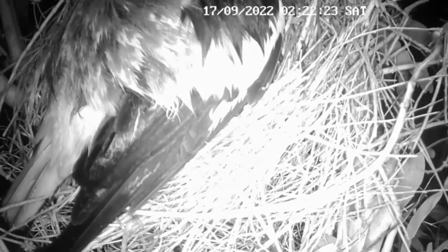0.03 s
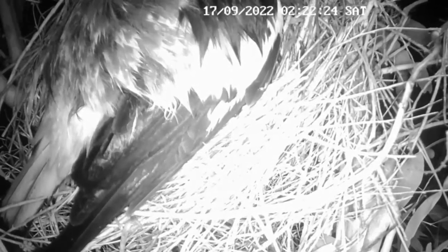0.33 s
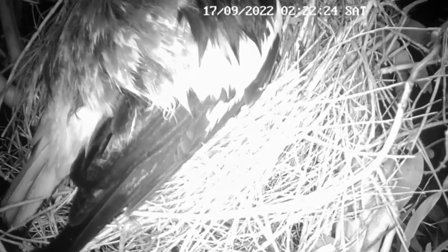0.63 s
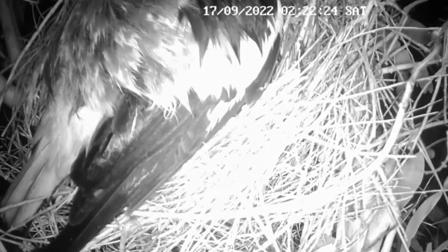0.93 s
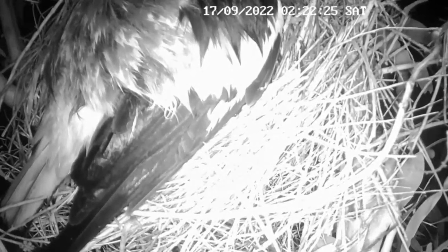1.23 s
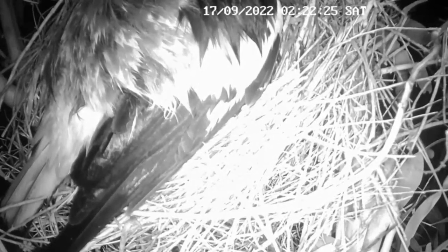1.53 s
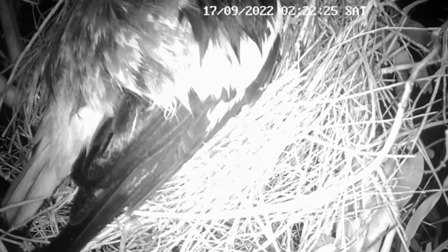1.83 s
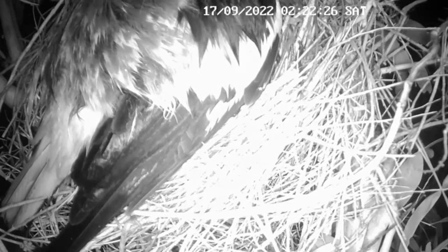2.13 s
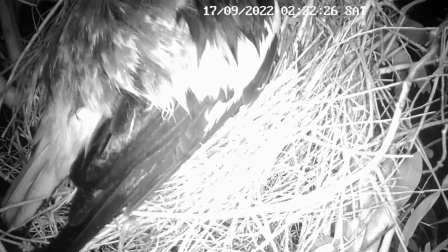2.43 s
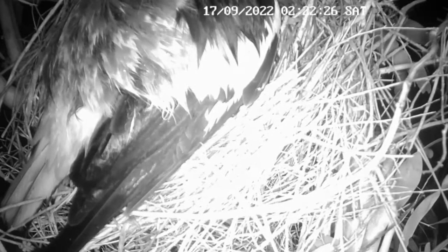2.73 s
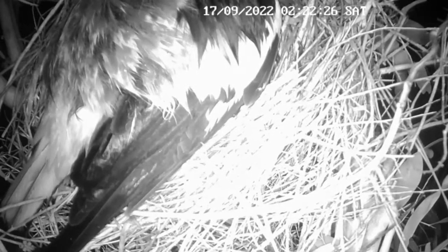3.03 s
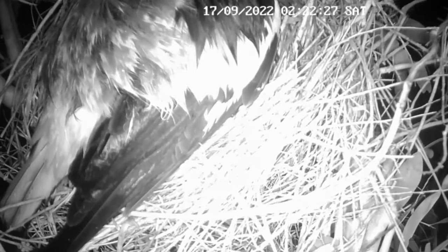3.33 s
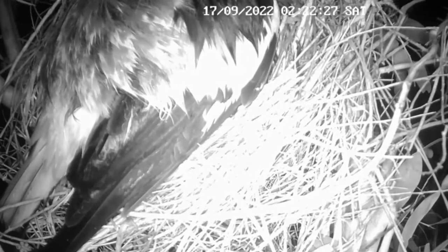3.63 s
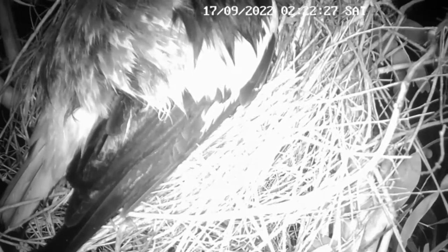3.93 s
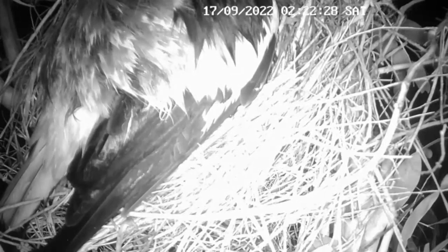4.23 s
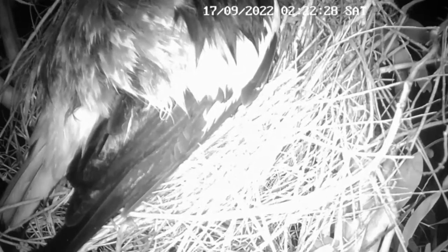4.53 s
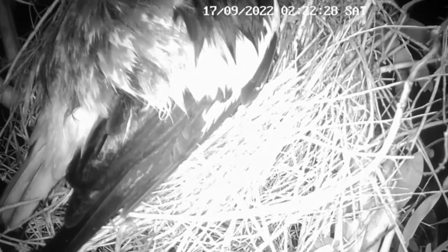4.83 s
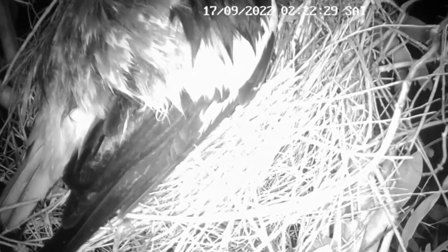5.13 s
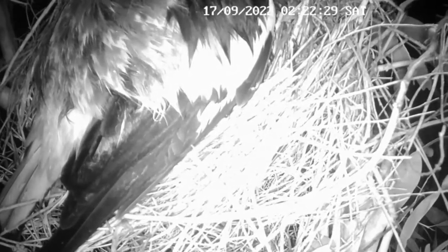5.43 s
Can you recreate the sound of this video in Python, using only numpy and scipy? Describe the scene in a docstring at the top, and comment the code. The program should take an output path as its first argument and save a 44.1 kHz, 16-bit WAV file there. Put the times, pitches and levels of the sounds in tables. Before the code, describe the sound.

Outdoors at night, a brief low puff of wind bumps a small microphone in a bird's nest. Distant frogs call faintly throughout, mixing short, high rising whistles with dry trills over a soft hiss and low rumble. The calls grow busier in the middle. Near the end a stronger gust buffets the microphone, rustling leaves and making dry twigs tick.

```python
"""Distant frogs call at night: short rising whistles and dry trills, pulses that ring a vocal sac.
Trees scatter the calls, and farther callers merge into a chorus over a soft hiss and a faint hum.
Wind buffets a small microphone at a bird's nest, at first and again near the end,
when a gust also stirs leaves and twigs."""
import sys
import numpy as np
from scipy import signal
from scipy.fft import rfft, irfft
from scipy.io import wavfile
from scipy.ndimage import uniform_filter1d

SR = 44100
rng = np.random.default_rng(int(sys.argv[2]) if len(sys.argv) > 2 else 0)


def bounce(signal):
    """Save signal as a 16-bit WAV file at the path given by the first command-line argument."""
    frames = np.transpose(np.atleast_2d(signal))
    limited = np.clip(frames, -1, 1)
    pcm = np.round(limited * 32767).astype(np.int16)
    wavfile.write(sys.argv[1], SR, pcm)


N = 250929
T = np.arange(N) / SR


def whistles(throb_hz=32, throb_db=2.5, buzz_hz=184.2, buzz_depth=0.21, scoop_hz=40, overhang_s=0.018):
    """Amplitude modulation: each rising note throbs, and a fast throat tremor gives it sidebands."""
    # Each row: start in seconds, length in seconds, starting pitch in Hz, rise in Hz, level in dB.
    notes = [(0.036, 0.071, 2210, 59, -63.5), (.275, 0.062, 2226, 58, -63), (.705, 0.091, 2175, 34, -60.5),
             (.865, .06, 2400, 67, -63), (1.33, 0.046, 2185, 60, -61), (1.515, .08, 2110, 93, -59),
             (1.571, 0.073, 2350, 63, -65), (1.6, 0.066, 2150, 87, -55.5), (1.915, 0.094, 2133, 110, -55),
             (2.213, 0.063, 2350, 88, -56.5), (2.235, 0.11, 2180, 20, -55.5),
             (2.339, 0.13, 2054, 194, -58.5), (2.38, 0.14, 2500, 120, -58), (2.52, 0.068, 2200, 53, -56),
             (2.545, 0.12, 2370, 79, -55), (2.589, 0.091, 2135, 140, -53.5), (2.717, 0.1, 2570, 57, -58.5),
             (2.84, .075, 2100, 106, -55.5), (2.915, 0.1, 2120, 100, -55.5), (2.933, .075, 2374, 71, -56),
             (3.044, 0.07, 2610, 27, -58), (3.16, 0.1, 2110, 130, -56.5), (3.235, 0.07, 2107, 75, -56),
             (3.28, .09, 2334, 110, -60), (3.342, 0.069, 2550, 170, -58.5), (3.463, 0.072, 2183, 89, -56.5),
             (3.474, 0.098, 1904, 210, -54), (3.57, .1, 2090, 130, -57.5), (3.635, 0.11, 2350, 80, -55),
             (3.78, 0.066, 2200, 59, -55.5), (3.843, 0.063, 2030, 73, -55), (3.855, 0.061, 2157, 79, -57.5),
             (4.002, 0.079, 2103, 110, -55), (4.005, 0.088, 2360, 156, -58), (4.125, 0.1, 2084, 200, -54.5),
             (4.207, 0.061, 1990, 114, -55), (4.349, 0.067, 2020, 120, -57), (4.355, .1, 2196, 160, -57.5),
             (4.477, 0.098, 2130, 120, -56), (4.722, .085, 2090, 185, -54.5), (4.762, .06, 2375, 40, -52.5),
             (4.97, 0.084, 2023, 93, -61), (5.146, 0.068, 2077, 50, -60), (5.214, 0.039, 2270, 90, -59),
             (5.28, 0.053, 1930, 80, -66), (5.36, 0.066, 2070, 123, -57), (5.462, 0.059, 2073, 83, -57.5),
             (5.525, 0.057, 2182, 50, -53)]
    wobble = 1 + 0.0092 * walk(rate=200)
    # an unsteady throat spreads a narrow skirt of noise round each note
    hoarse = undb(2.0 * walk(rate=160)) + undb(-9) * walk(rate=530)
    faint = [(when, 0.05, 2192.5, 112, -71.5) for when in at_random(count=10)]
    out = np.zeros(N)
    for start, length, start_hz, rise_hz, db in notes + faint:
        progress = np.linspace(0, 1, int((length + overhang_s) * SR))
        now = (int(start * SR) + np.arange(len(progress))) % N
        hz = (start_hz + rise_hz * progress - scoop_hz * (1 - progress) ** 4) * wobble[now]
        tone = np.sin(2 * np.pi * np.cumsum(hz) / SR)
        turn = 2 * np.pi * T[:len(progress)]
        throb = undb(-throb_db * np.cos(throb_hz * turn))
        buzz = 1 + buzz_depth * np.sin(buzz_hz * turn)
        swell = np.sqrt(np.abs(np.sin(np.pi * progress ** 1.25)))
        add(out, start - 0.76 * overhang_s, undb(db) * unit(swell * hoarse[now] * throb * buzz * tone))
    return undb(0.76) * trees(out, t60=.22, wet_db=-6)


def trills(scatter_db=1.7, scatter_pitch=0.025, jitter_s=.0006, fade_db=-3.5):
    """Impulse excitation: uneven, weakening trains of throat pulses ring the vocal sac."""
    # Each row: start in seconds, length in seconds, pulses per second, pitch in Hz, level in dB.
    calls = [(.151, .06, 48, 3460, -54), (.215, .06, 60, 3600, -58), (0.211, .04, 45, 2670, -60.5),
             (.58, 0.023, 81, 3485, -52), (.634, .022, 77, 3490, -49), (.67, .03, 54, 3560, -51),
             (0.717, .13, 62, 3460, -55), (0.755, .04, 70, 2600, -59), (.863, .055, 55, 3630, -60),
             (.865, .05, 50, 2720, -58), (.959, .095, 48, 2710, -56), (1.025, 0.033, 55, 3530, -56),
             (1.057, .1, 45, 3440, -55), (1.158, .08, 58, 2500, -60), (1.251, .06, 50, 3380, -60),
             (1.279, .15, 42, 2620, -61), (1.354, .07, 60, 3500, -53.5), (1.55, .025, 72, 2560, -52),
             (1.591, 0.024, 70, 3560, -53), (1.596, .07, 60, 2590, -60), (1.655, .075, 68, 3520, -52.5),
             (1.912, .055, 58, 3300, -53.5), (1.979, .11, 56, 3560, -59), (2.0, .08, 55, 2700, -60),
             (2.111, 0.015, 58, 3420, -48.5), (2.129, .047, 65, 2570, -57), (2.166, .08, 58, 3520, -54),
             (2.432, .018, 100, 3280, -46.5), (2.497, .074, 89, 3270, -47.5), (2.621, .1, 50, 3520, -57),
             (2.721, .12, 55, 3350, -59.5), (3.045, .125, 65, 3330, -59), (3.38, 0.033, 55, 2740, -58),
             (3.467, .065, 53, 2880, -53.5), (3.465, 0.053, 53, 3650, -59), (3.552, .015, 60, 3540, -49),
             (3.589, .1, 45, 2870, -55), (3.608, .145, 60, 3590, -54.5), (4.037, .17, 45, 2665, -63),
             (4.273, .03, 48, 2830, -54), (4.338, 0.069, 48, 2800, -56), (4.336, 0.069, 48, 3800, -54.5),
             (4.561, .16, 50, 2650, -58), (4.837, .16, 54, 3500, -58.5)]
    faint = [(when, .12, 76, 3200, -67) for when in at_random(count=9)]
    faint += [(when, .119, 84, 2535, -64.5) for when in at_random(count=9)]
    out = np.zeros(N)
    for start, length, rate, hz, db in calls + faint:
        ring_s = .00125 * 3500 / hz  # a higher resonance rings more briefly
        call = np.zeros(N // 8)
        for t, (late, size, sharp) in zip(np.arange(0, length, 1 / rate), rng.standard_normal((32, 3))):
            strength = undb(scatter_db * size + fade_db * t / length)
            pulse = strength * vocal_sac(hz * (1 + scatter_pitch * sharp), ring_s)
            onset = int(max(t + jitter_s * late, 0) * SR)
            call[onset:onset + len(pulse)] += pulse
        add(out, start - ring_s, undb(db) * call * np.sqrt(length * SR / np.sum(call ** 2)))
    return trees(out, t60=.28, wet_db=-4.5)


def vocal_sac(hz, rise_s):
    """Damped resonance: the response to one pulse swells and dies away."""
    t = T[:SR // 40]
    envelope = (t / rise_s * np.exp(1 - t / rise_s)) ** 2
    return envelope * np.sin(2 * np.pi * hz * t + rng.uniform(0, 2 * np.pi))


def trees(dry, t60, wet_db):
    """Scattering: trunks and foliage give a distant call a short reverberant tail."""
    tail = rng.standard_normal(SR) * np.exp(-np.log(1000) * T[:SR] / t60)
    wet = undb(wet_db) * signal.fftconvolve(dry, tail / np.linalg.norm(tail))[:N]
    return (dry + wet) / np.hypot(1, undb(wet_db))


def wind(rumble_db=-3, flutter_db=-12.5, flutter_growth=1.685, edge_ratio=3.6):
    """Turbulence: eddies press on the microphone as slow rumble, quicker flutter and single buffets."""
    # Each row: frequency in Hz, relative spectral density in dB.
    rumble_spectrum = [(8, 0.5), (24, 2), (45, -10), (70, -12), (110, -23), (200, -55), (500, -118.5)]
    flutter_spectrum = [(50, -26), (90, -2), (125, 3), (165, 4), (210, -11), (300, -12.5), (450, -20.5),
                        (700, -39), (1500, -77.5)]
    # Each row: time of reaching full force in seconds, hold in seconds, relative level in dB.
    gusts = [(0, 0.14, -27), (0.226, 0.32, -30.5), (3.38, 0.099, -29), (3.496, 0.12, -29),
             (3.648, 0.71, -38), (4.057, 0.038, -29.5), (4.707, 0.51, -25.5), (5.144, 0.38, -11.5),
             (5.154, 0.02, -8), (5.39, 0.052, -5), (5.577, 0.11, -16)]
    # Each row: time in seconds, peak in dB, pitch in Hz, sharp edge in dB relative to the peak.
    buffets = [(.008, -26, 142, -48), (0.016, -16.5, 126, -39), (0.025, -16, 74, -33),
               (.064, -9, 90.4, -41), (.1, -38, 124, -34), (0.246, -20.5, 61, -39), (0.275, -43, 88.4, -36),
               (0.365, -27.5, 64.4, -37), (0.427, -34.5, 99, -31), (.461, -29, 61.4, -33),
               (3.398, -34, 86.6, -30), (3.554, -36, 69.6, -38), (4.067, -32, 46.6, -35),
               (4.727, -20.5, 66, -35), (4.871, -30, 99, -31), (5.12, -24.5, 114, -30),
               (5.136, -27.5, 104, -24), (5.169, -6.5, 42.7, -7.5), (5.199, -16, 50, -31),
               (5.228, -14, 60, -31), (5.254, -14.5, 104, -26.5), (5.265, -18.5, 45, -34),
               (5.301, -14.5, 78, -22), (5.343, -20, 55, -33), (5.366, -21, 119, -22),
               (5.389, -14.5, 42, -28), (5.408, -9, 137, -28), (5.429, -15, 233, -20.5),
               (5.451, -10, 45, -18), (5.462, -11, 141, -23.5), (5.47, -11, 60, -27),
               (5.504, -10.5, 47.4, -30), (5.534, -24.5, 209, -44), (5.559, -17.5, 93, -31),
               (5.595, -20, 89, -29.5), (5.63, -25, 64.6, -31)]
    force = np.max([undb(db) * gust(start, hold) for start, hold, db in gusts], axis=0)
    rumble = steady(noise(rumble_spectrum)) * undb(rumble_db) * force
    # a harder gust is more turbulent, so flutter grows faster than rumble
    flutter = steady(noise(flutter_spectrum)) * undb(flutter_db) * force ** flutter_growth
    out = rumble + flutter
    for when, db, hz, edge_db in buffets:
        buffet = push_pull(hz) + undb(edge_db) * push_pull(edge_ratio * hz)
        add(out, when - 1 / 20, undb(db) * buffet)
    return out


def gust(full_at, hold, attack_s=0.063, release_s=0.057):
    """Growth and decay: a gust's force builds quadratically, holds and falls exponentially."""
    build = np.clip(1 + (T - full_at) / attack_s, 0, 1) ** 2
    return build * np.exp(-np.maximum(T - full_at - hold, 0) / release_s)


def push_pull(hz):
    """Bipolar pulse: one eddy's swing of pressure, peak 1, centred in a tenth of a second."""
    phase = 2 * np.pi * hz * (T[:SR // 10] - 1 / 20)
    return phase * np.exp((1 - phase ** 2) / 2)


def foliage(flicker_db=1.0, tick_s=0.00065, tick_ratio=1.19):
    """Friction and impact: leaves rustle in the breeze and dry twigs tick against each other."""
    # Each row: frequency in Hz, relative spectral density in dB.
    rustle_spectrum = [(500, -1.5), (1000, -10.5), (1700, -2.5), (3000, -0.5), (4200, 2.5), (5200, 5),
                       (6200, -2), (7200, -14), (8500, -45)]
    # Each row: time in seconds, level of the rustle in dB.
    rustle_levels = [(0, -68), (1.2, -59), (2.35, -62.5), (2.6, -57.5), (4.2, -55.5), (4.8, -49),
                     (5.69, -50.5)]
    # Each row: start in seconds, peak in dB, pitch in Hz.
    twigs = [(1.424, -47, 5300), (1.471, -39, 3000), (2.313, -46, 5200), (2.582, -40.5, 5430),
             (3.22, -39, 4950), (3.72, -41, 5000), (5.034, -37, 4730), (5.241, -26.5, 4900),
             (5.328, -38, 4800), (5.346, -35, 4870), (5.378, -35, 4960), (5.395, -32.5, 5340),
             (5.417, -32, 4790)]
    out = noise(rustle_spectrum) * undb(curve(rustle_levels) + flicker_db * walk(rate=180))
    t = T[:SR // 50]
    for when, db, hz in twigs:
        wood = signal.butter(4, [hz / tick_ratio, hz * tick_ratio], "band", fs=SR, output="sos")
        tick = signal.sosfilt(wood, rng.standard_normal(len(t)) * t * np.exp(-t / tick_s))
        add(out, when, undb(db) * tick / np.abs(tick).max())
    return out


def chorus():
    """Incoherent summation: farther callers merge into two shimmering bands of noise."""
    # Each row: time in seconds, relative level of the chorus in dB.
    levels = [(0, -65), (1.2, -61.5), (2.1, -59), (3.1, -62), (3.6, -59), (5.69, -59.5)]
    low = noise([(1600, -30.0), (2000, 0.5), (2200, 1.5), (2550, -1.5), (3000, -3.0), (3600, -53)])
    high = noise([(2600, -31), (3150, 0.5), (3500, 0.0), (3900, -2.5), (4700, -44.5)])
    low *= undb(2.0 * walk(rate=78))
    high *= undb(-1.0 + 4.0 * walk(rate=150))
    return undb(curve(levels)) * (low + high)


def lulls():
    """Gaussian dips in gain: the trills and the chorus fall quiet now and then."""
    # Each row: centre in seconds, width in seconds, depth in dB.
    dips = [(2.35, 0.056, -22), (3.84, .055, -15)]
    return undb(sum(db * np.exp(-((T - when) / width) ** 2) for when, width, db in dips))


def night_air(level_db=-45.5):
    """Broadband ambient noise: a soft hiss over a low rumble, wandering slightly in level."""
    # Each row: frequency in Hz, relative spectral density in dB.
    spectrum = [(10, -2), (22, -.5), (58, -2), (90, -14.5), (130, -10.5), (300, -19), (430, -21),
                (620, -24), (880, -22.5), (1500, -28.5), (2300, -29), (5000, -33), (7200, -68), (9000, -78)]
    return noise(spectrum) * undb(level_db + 1.2 * walk(rate=7))


def dropouts(stretch=1, depth_share=1, edge_s=0.028):
    """Gating: the gain of one layer of the hiss drops for a few moments."""
    # Each row: start in seconds, length in seconds before stretching, full depth in dB.
    gaps = [(0, 0.035, -4.5), (5.102, 0.097, -34), (5.481, 0.045, -37)]
    db = sum(depth * ((T >= start) & (T < start + stretch * length)) for start, length, depth in gaps)
    return undb(uniform_filter1d(depth_share * db, int(edge_s * SR)))


def hum(pitch_hz=395.5, level_db=-70.5, swell_db=13.5, swell_at_s=3.86, swell_width_s=0.21):
    """Slow modulation: a faint far-off tone wavers in pitch and level and swells once."""
    hz = pitch_hz * (1 + 0.00841 * walk(rate=14))
    tone = unit(np.sin(2 * np.pi * np.cumsum(hz) / SR))
    swell = swell_db * np.exp(-((T - swell_at_s) / swell_width_s) ** 2)
    return tone * undb(level_db + swell + 1.9 * walk(rate=6))


def undb(db):
    """Decibels to amplitude gain."""
    return 10 ** (np.asarray(db) / 20)


def unit(x):
    """Normalisation to rms 1."""
    return x / np.sqrt(np.mean(x ** 2) + 1e-20)


def steady(x, window_s=0.11):
    """Normalisation by the running rms, which evens out slow changes of level."""
    return x / np.sqrt(uniform_filter1d(x ** 2, int(window_s * SR)) + 1e-9)


def curve(rows):
    """Linear interpolation between (seconds, value) points."""
    return np.interp(T, *np.transpose(rows))


def noise(points):
    """Spectral shaping: noise of rms 1 that follows (Hz, dB) points."""
    hz, db = np.transpose(points)
    gain = undb(np.interp(np.log(np.fft.rfftfreq(N, 1 / SR) + 1), np.log(hz), db))
    gain[0] = 0
    return unit(irfft(rfft(rng.standard_normal(N)) * gain, N))


def walk(rate):
    """Smooth random fluctuation of rms 1, with `rate` new values a second."""
    step = max(int(SR / rate), 1)
    stairs = np.repeat(rng.standard_normal(N // step + 1), step)
    return unit(uniform_filter1d(stairs, step)[:N])


def at_random(count):
    """Stratified random times in seconds, one in each equal share of the scene."""
    return (np.arange(count) + rng.random(count)) * T[-1] / count


def add(track, start, sound):
    """Superpose a sound on the track at a time in seconds."""
    at = int(start * SR) + np.arange(len(sound))
    inside = (at >= 0) & (at < N)
    track[at[inside]] += sound[inside]


def scene(crisp_hz=3000):
    """Superposition: frogs, wind, foliage and night air sum at one microphone."""
    air = night_air()
    leaves = foliage()
    dull = signal.sosfiltfilt(signal.butter(3, crisp_hz, fs=SR, output="sos"), leaves)
    crisp = leaves - dull
    soft = air + dull + (chorus() + trills()) * lulls()
    # after a dropout the crisp rustle comes back first
    hiss = soft * dropouts(stretch=2.25, depth_share=0.72) + crisp * dropouts()
    return (hiss + hum() + whistles() + wind())[None]


def record(dry, ceiling=1.5, top_hz=9000):
    """Saturation and band limiting: the strongest gusts are rounded off and the top is cut."""
    rounded = ceiling * np.tanh(dry / ceiling)
    return signal.sosfilt(signal.ellip(8, .2, 70, top_hz, fs=SR, output="sos"), rounded)


dry = scene()
out = record(dry)
bounce(out)
```